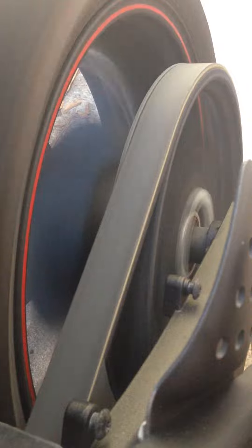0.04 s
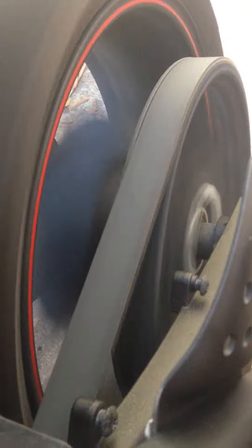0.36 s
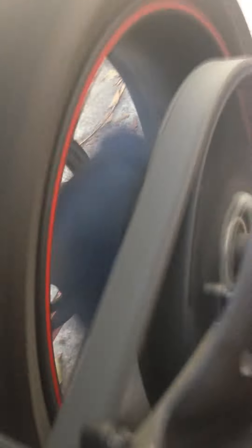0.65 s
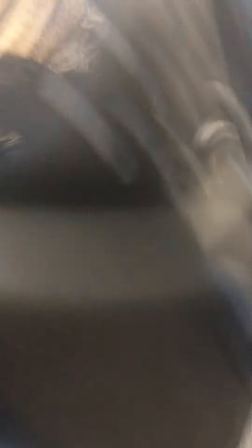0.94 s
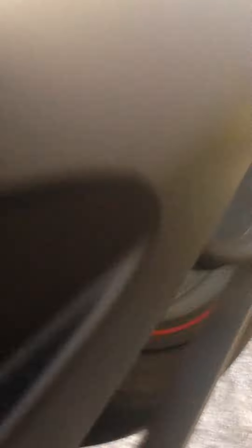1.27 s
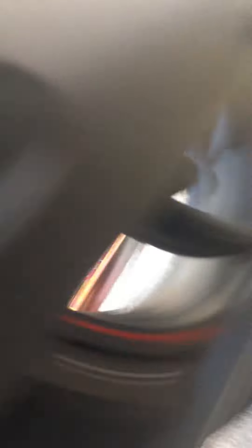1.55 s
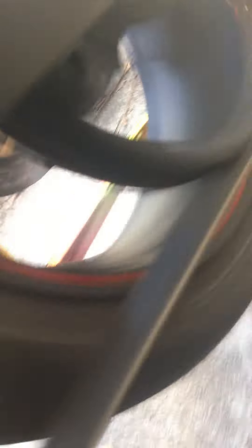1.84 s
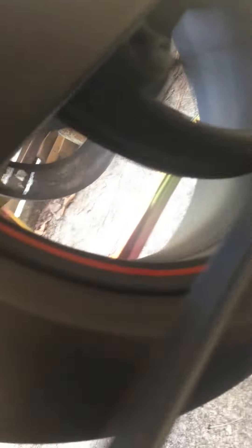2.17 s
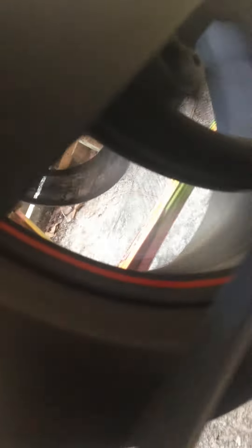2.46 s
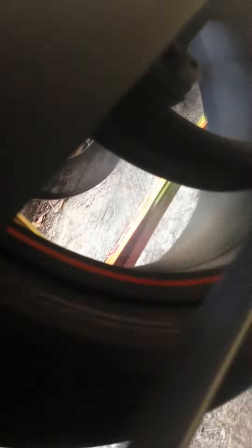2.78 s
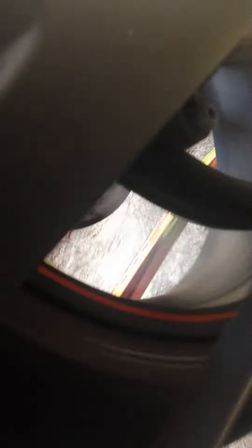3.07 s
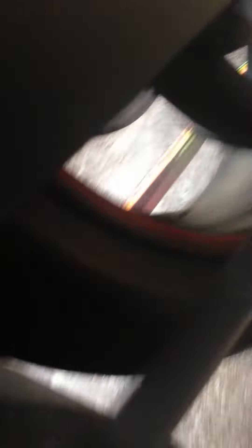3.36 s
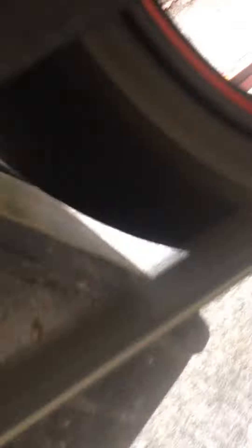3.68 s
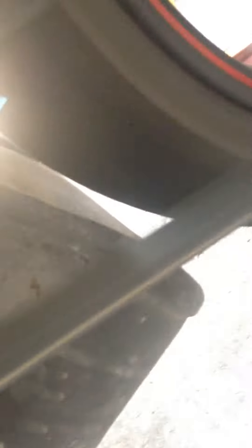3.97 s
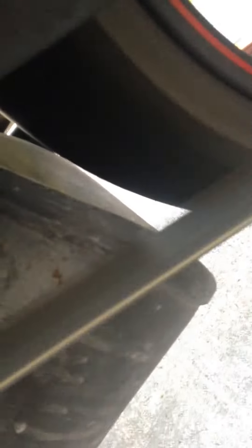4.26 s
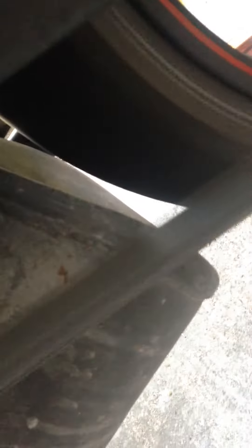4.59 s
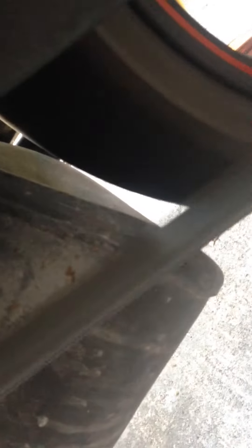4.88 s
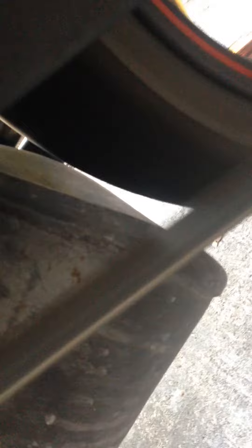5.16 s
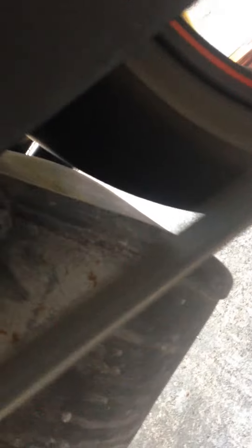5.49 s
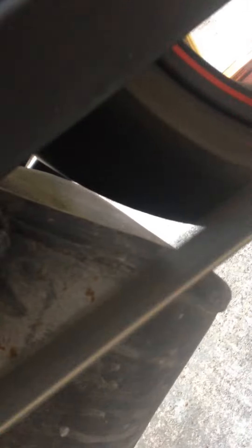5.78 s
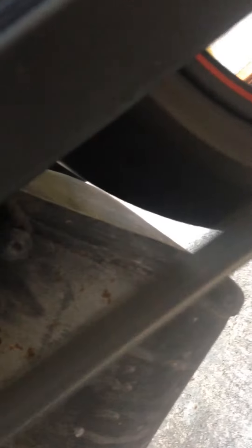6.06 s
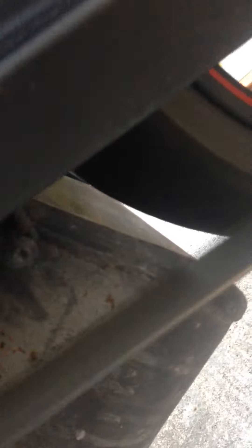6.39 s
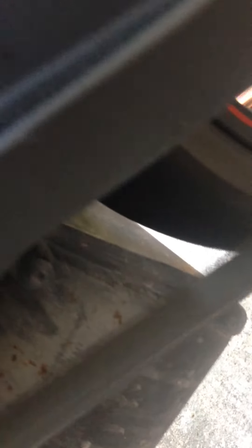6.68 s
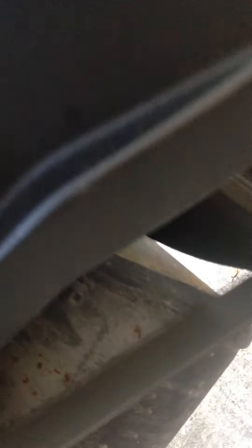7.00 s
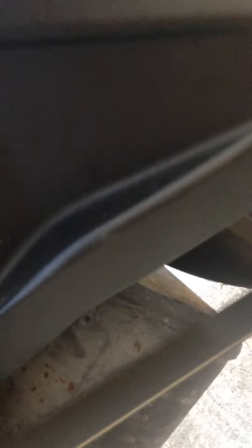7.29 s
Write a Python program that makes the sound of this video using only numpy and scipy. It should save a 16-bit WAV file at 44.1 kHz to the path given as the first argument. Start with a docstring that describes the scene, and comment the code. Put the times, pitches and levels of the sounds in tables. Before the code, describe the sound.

A V-twin motorcycle idles close by with uneven exhaust thumps, mechanical clatter and irregular sharp metal clunks from the drivetrain.

```python
"""Uneven exhaust thumps: a V-twin motorcycle idles in gear, its raised rear wheel turning, heard close
beside the belt drive. Each firing sends a gas pulse through the muffler, while valve gear and primary
drive clatter in the cases and the belt chirps on its pulley. Slack in the drivetrain takes up with
sharp metal clunks, and the hardest push a limiter down.
A faint high whine swells, sinks in pitch and fades near the end."""
import sys
import numpy as np
from scipy import signal
from scipy.fft import rfft, irfft, next_fast_len
from scipy.io import wavfile
from scipy.ndimage import uniform_filter1d, minimum_filter1d

SR = 44100
rng = np.random.default_rng(int(sys.argv[2]) if len(sys.argv) > 2 else 0)


def unload_audio(sound):
    """Save the sound as a 16-bit wav file, at the path given as the first command line argument."""
    columns = np.transpose(np.atleast_2d(sound))
    # keep every value between -1 and 1, then stretch to whole-number steps
    steps = np.round(np.clip(columns, -1, 1) * 32767)
    wavfile.write(sys.argv[1], SR, steps.astype(np.int16))


N = 328104
TIME_S = np.arange(N) / SR


def from_db(db):
    """Decibels to gain."""
    return 10 ** (np.asarray(db) / 20)


def unit_rms(x):
    """Scale to rms 1."""
    return x / np.sqrt(np.mean(x ** 2) + 1e-20)


def automation(rows):
    """One curve per value column, drawn through timed breakpoints."""
    times, *columns = np.transpose(rows)
    return [np.interp(TIME_S, times, column) for column in columns]


def add(out, start_s, sound):
    """Mix a sound in at a time, dropping what falls outside."""
    at = round(start_s * SR) + np.arange(len(sound))
    inside = (at >= 0) & (at < N)
    out[at[inside]] += sound[inside]


def coloured(x, spectrum, resonances=()):
    """A broad EQ curve with resonances standing out of it; the result has rms 1."""
    size = next_fast_len(len(x), real=True)
    hz = np.geomspace(1, SR / 2, 3000)
    points, db = np.transpose(spectrum)
    lift = 1 + sum(from_db(boost) ** 2 / (1 + (2 * (hz - centre) / width) ** 2)
                   for centre, width, boost in resonances)
    gain = from_db(np.interp(np.log(hz), np.log(points), db)) * np.sqrt(lift)
    gain *= np.minimum(hz / points[0], 1) ** 2 * np.minimum(points[-1] / hz, 1) ** 2   # ends roll off
    bin_gain = np.interp(np.arange(size // 2 + 1) * SR / size, hz, gain)
    return unit_rms(irfft(rfft(x, size) * bin_gain, size)[:len(x)])


def rattle(per_s, smooth):
    """Many small contacts of uneven size over smooth noise."""
    noise = rng.standard_normal(N)
    contacts = noise * (rng.random(N) < per_s / SR)
    return unit_rms(contacts) + smooth * noise


def whine(peak_s, half_width_s, pitch_hz, sag_hz_per_s, level_db, rough):
    """A faint, wavering high tone that swells and eases off as its pitch sinks."""
    t = TIME_S - peak_s
    wobble = rough * coloured(rng.standard_normal(N), [(10, -6), (80, 7), (300, -22)])
    turns = np.cumsum(pitch_hz - sag_hz_per_s * t) / SR
    return from_db(level_db) * np.exp(-(t / half_width_s) ** 2) * np.sin(2 * np.pi * turns + wobble)


# Standout chirps of the belt: peak_s, pitch_hz, level_db
BELT_CHIRPS = [(.638, 2890, -28.5), (.812, 2870, -31), (1.16, 2550, -26), (1.638, 2350, -22),
               (2.508, 2500, -23), (2.983, 2490, -23), (3.14, 2420, -21.5), (3.557, 2550, -24),
               (3.822, 2540, -25), (7.401, 2390, -25)]
# Automation for the faint random squeaks in between: time_s, pitch_hz, level_db
SQUEAK_CURVE = [(0, 2860, -38), (1.05, 2820, -34), (1.4, 2410, -30), (3.1, 2454, -25.5), (4.2, 2480, -34),
                (6.0, 2480, -37), (6.9, 2510, -29)]


def belt(gain_db, rough, half_width_s, squeaks_per_s, detune, spread_db):
    """Each brief slip of the belt's edge on the pulley flange sings one rough, thin note."""
    out, t = np.zeros(N), np.arange(-SR // 5, SR // 5) / SR
    waver = coloured(rng.standard_normal(N), [(10, -6), (80, 4), (300, -20)])
    pitch, level = automation(SQUEAK_CURVE)
    higher, louder = rng.standard_normal((2, N))
    squeaks = [(i / SR, pitch[i] * (1 + detune * higher[i]), level[i] + spread_db * louder[i])
               for i in np.flatnonzero(rng.random(N) < squeaks_per_s / SR)]
    envelope = np.exp(-(t / half_width_s) ** 2)
    for peak_s, hz, db in [*BELT_CHIRPS, *squeaks]:
        wobble = rough * np.roll(waver, -round(peak_s * SR))[:len(t)]
        add(out, peak_s + t[0], from_db(db + gain_db) * envelope * np.sin(2 * np.pi * hz * t + wobble))
    return out


# Valve and piston ticks after each thump: delay_cycles, half_width_cycles, strength
ENGINE_TICKS = [(.02, 0.12, 0.31), (.38, 0.11, 0.62), (.62, 0.066, 0.78), (.78, 0.12, 0.71)]


def crank_surge(beats, spread_db):
    """A modulation curve locked to the crank: one bump per tick, uneven from cycle to cycle."""
    phase = np.interp(TIME_S, beats[:, 0], np.arange(len(beats)))
    surge = np.zeros(N)
    for delay, width, strength in ENGINE_TICKS:
        cycle = np.round(phase - delay)
        uneven = from_db(spread_db * rng.uniform(-1.1, 1, len(beats) + 1))[cycle.astype(int) + 1]
        surge += strength * uneven * np.exp(-((phase - delay - cycle) / width) ** 2)
    return surge


# Bright hiss: freq_hz, gain_db
HISS_EQ = [(1800, -6), (2800, 2.5), (3600, 2), (4600, -6.5), (5300, -7), (6300, -13.5), (8000, -25),
           (10500, -26.5), (13000, -31), (15500, -43)]


def parts_hiss(surge):
    """Small moving parts blur into a pulsing hiss."""
    return coloured(rattle(per_s=2200, smooth=2.1) * (1 + 1.14 * surge), HISS_EQ)


# Low rush of gas: freq_hz, gain_db
RUSH_EQ = [(20, -4), (45, 4.5), (110, 7), (170, 12.5), (220, 5.5), (255, -5.5), (320, 1), (500, -0.5),
           (800, -22), (1500, -37)]
# Exhaust pipe resonances: centre_hz, width_hz, boost_db
PIPE_MODES = [(161.3, 13, 2.5), (286, 27, 5.5), (408, 67, 1)]


def gas_rush(surge):
    """Surging exhaust flow sets the pipe humming."""
    return coloured(rng.standard_normal(N) * (1 + 0.81 * surge), RUSH_EQ, PIPE_MODES)


# Tone of the primary cover: freq_hz, gain_db
COVER_EQ = [(1200, -30), (2000, 2), (2700, 5), (4000, -26)]
# Its resonances: centre_hz, width_hz, boost_db
COVER_MODES = [(2350, 100, 23.5), (2464, 120, 19)]


def cover_ring(surge):
    """The rattling drive rings the primary cover."""
    return coloured(rattle(per_s=1200, smooth=0.64) * (1 + 1.3 * surge), COVER_EQ, COVER_MODES)


# Clatter from beside the cases: freq_hz, gain_db
BESIDE_EQ = [(250, -9.5), (450, -6), (800, -5.5), (1150, -3), (1350, -5.5), (1600, -3.5), (2000, -3),
             (2500, -10), (3000, -15), (4000, -22), (6000, -59)]
# Case resonances: centre_hz, width_hz, boost_db
CASE_MODES = [(649, 45, 6.8), (838, 24, 10.1), (943, 66, 8.4), (1130, 28, 3.1), (1447, 33, 6.3),
              (1690, 60, 11.1), (1860, 50, 2.9)]
# The same clatter from above the belt: freq_hz, gain_db
ABOVE_EQ = [(150, -12), (235, 1.5), (330, -5), (480, -3.5), (700, -1), (950, -0.5), (1080, -2), (1240, 0.5),
            (1480, 0), (1750, 0.5), (2000, -1.5), (2850, -9.5), (3300, -15), (6000, -42)]


def case_clatter(surge, beside):
    """Gears, chain and valves rattle the cases, whose ring comes in as the mic moves beside them."""
    ringing = coloured(rattle(per_s=2200, smooth=1.0) * (1 + 0.7 * surge), BESIDE_EQ, CASE_MODES)
    above = coloured(rattle(per_s=2600, smooth=1.5) * (1 + 0.4 * surge), ABOVE_EQ)
    return np.sqrt(beside) * ringing + np.sqrt(1 - beside) * from_db(0.5) * above


# Fader ride for the whole engine bed at the moving mic: time_s, level_db
BED_FADER = [(0, -23.5), (.45, -26.5), (.9, -23.5), (2.15, -24), (2.6, -22.5), (3.2, -22), (3.75, -24),
             (4.3, -22.5), (5.55, -24), (6.05, -26.5), (6.8, -23), (7.44, -24)]
# Cover ring against the clatter, strongest when the mic faces it: time_s, level_db
COVER_FADER = [(0, -11), (1.1, -8), (1.9, -5.5), (3.2, -7.5), (4.0, -12), (6.2, -12), (7.44, -6.5)]


def engine_bed(beats, mic_move_s, rush_above_db, rush_beside_db, hiss_db):
    """Clatter, cover, rush and hiss surge together; their levels are set against the clatter."""
    (bed_db,), (cover_db,) = automation(BED_FADER), automation(COVER_FADER)
    surge = crank_surge(beats, spread_db=4.4)
    beside = np.interp(TIME_S, mic_move_s, [0, 1])   # 0 above the belt, 1 down beside the cases
    clatter = case_clatter(surge, beside)
    cover = from_db(cover_db) * cover_ring(surge)
    rush = from_db(rush_above_db + (rush_beside_db - rush_above_db) * beside) * gas_rush(surge)
    hiss = from_db(hiss_db) * parts_hiss(surge)
    return from_db(bed_db) * (clatter + cover + rush + hiss)


def slack_taps(count, from_s, to_s, force_db, spread_db, sharpness_db, ring_db):
    """Cues for light knocks of the slack at random moments, in rows like the clunks."""
    return [(from_s + (to_s - from_s) * when, force_db + spread_db * (2 * size - 1), sharpness_db, ring_db)
            for when, size in rng.random((count, 2))]


# Drivetrain clunks: start_s, force_db, sharpness_db, ring_db
CLUNK_CUES = [(.242, -24.5, -3.5, 4), (.556, -15.5, -15, 3), (.708, -27, -4, -7), (.970, -26.5, -1, -2),
              (1.17, -21, -4, 0.5), (1.254, -17, -5, 4), (1.717, -15, -7, -14), (1.810, -15.5, -8, -4.5),
              (1.956, -22, -8, -3), (2.012, -12.5, -4.5, -0.5), (2.468, -20.5, -13, -1),
              (2.526, -18.5, -6, -5), (3.072, -21, -1, -4), (3.168, -23.5, -4, 1.5),
              (3.244, -18.5, -1.5, -8), (3.458, -20, 1, -1.5), (3.628, -16, -7, -2.5), (3.974, -22, -4, -7),
              (4.192, -21.5, -1, -3), (4.362, -18.5, -8, -6), (4.602, -18, -12, -9), (4.657, -16, -5, -1.5),
              (4.910, -18.5, -1.5, -4), (5.015, -23, -10, -8), (5.033, -22.5, -10, -10),
              (5.077, -9, 2, 1.5), (5.126, -11.5, -2, 0), (5.229, -24.5, -2, -2), (5.304, -18.5, 1.5, -4),
              (5.431, -15, 3.5, -5.5), (5.642, -15.5, -1, 0), (5.690, -18, 6, 4), (5.862, -15.5, 3, 4)]
# Steel ring of a clunk: pitch_hz, level_db, t60_s
STEEL_MODES = [(663, -7, 0.091), (1097, -6, 0.031), (1285, -8.5, 0.031), (2118, 4, 0.065),
               (2249, -0.5, 0.046), (2826, -12, .03), (3474, -13.5, 0.058), (4020, -13, .025),
               (5475, -17, .024), (6280, -20, .026), (7360, -27, 0.028), (9150, -41, 0.026)]
# Dense modes of swingarm and pulley, as low body, mid body and top crack: freq_hz, gain_db
LOW_EQ = [(120, -12), (220, -10), (300, -6.5), (420, 0.5), (530, -2.5), (680, 3), (900, -10), (1500, -27)]
MID_EQ = [(500, -40), (850, 1.5), (1200, 4), (1450, 2), (1700, 3.5), (2400, -5), (3000, -3), (5000, -27)]
CRACK_EQ = [(1500, -12), (2800, -6), (3700, 4.5), (4600, -4.5), (5400, 0), (6600, -6), (8000, -18.5),
            (11000, -23.5), (15500, -64)]


def clunks(taps, seat_s, body_t60_s, crack_t60_s, low_db, mid_db, steel_db, crack_db):
    """Slack closes metal on metal: a short crack, a steel ring and a body that outlasts the crack."""
    out, t = np.zeros(N), np.arange(SR // 10) / SR
    blows = [*CLUNK_CUES, *taps]
    # close modes ring as bands of noise, fresh for every blow
    lows, mids, cracks = (coloured(rng.standard_normal(len(blows) * len(t)), eq).reshape(len(blows), -1)
                          for eq in (LOW_EQ, MID_EQ, CRACK_EQ))

    def swell(rise_s, t60_s):
        """Builds while the parts seat, then decays."""
        return np.minimum(t / rise_s, 1) * np.exp(-np.log(1000) * np.maximum(t - rise_s, 0) / t60_s)

    for k, (start_s, force, sharpness, ring) in enumerate(blows):
        attack_s = seat_s * np.exp(-0.08 * force)   # light knocks close more slowly
        steel = np.zeros(len(t))
        for hz, db, t60_s in STEEL_MODES:
            envelope = from_db(db + 1.5 * rng.normal()) * swell(attack_s, t60_s)
            detuned_hz = hz * (1 + 0.012 * rng.normal())
            steel += envelope * np.sin(2 * np.pi * (detuned_hz * t + rng.random()))
        thinning_db = 0.42 * sharpness   # sharper blows carry less low end
        low = from_db(low_db - thinning_db) * lows[k] * swell(1.35 * attack_s, body_t60_s)
        mid = from_db(mid_db) * mids[k] * swell(attack_s, body_t60_s)
        crack = from_db(crack_db + sharpness) * cracks[k] * swell(0.58 * attack_s, crack_t60_s)
        add(out, start_s, from_db(force) * (low + mid + crack + from_db(steel_db + ring) * steel))
    return out


# The gently hunting idle: time_s, crank_rpm
IDLE_SPEED = [(0.0, 1417.9), (0.6, 1401.1), (0.8, 1454.5), (1.4, 1397.5), (1.8, 1470.6), (2.0, 1394.2),
              (2.6, 1443.5), (2.8, 1391.0), (3.4, 1415.9), (3.6, 1389.8), (4.4, 1410.4), (5.4, 1381.1),
              (6.6, 1447.9), (7.44, 1415.4)]
# Weight of an ordinary firing: time_s, level_db
FIRING_LEVEL = [(0, -8), (.55, -10.5), (.7, -4.5), (1.05, -6), (1.35, -10.5), (1.66, -7), (2.12, -10.5),
                (2.45, -8), (3.2, -6.5), (3.85, -13), (4.05, -8.5), (4.76, -6.5), (5.0, -10.5), (5.4, -8),
                (6.05, -16), (6.4, -7.5), (6.68, -10), (7.05, -5.5)]
# Accents, where a cycle burns weakly and the next thumps hard on the unburnt charge: near_s
ACCENTS = [.16, .42, 1.09, 1.6, 1.93, 2.27, 2.78, 2.95, 3.29, 3.63, 3.98, 4.32, 4.49, 4.66, 5.26, 6.37,
           6.87]


def firings(first_s, spread_db, hard_db, weak_loss_db):
    """The main firing comes once every two crank turns; returns rows of time_s, level_db."""
    rpm, = automation(IDLE_SPEED)
    cycles = np.cumsum(rpm) / (2 * 60 * SR)
    cycles -= np.interp(first_s, TIME_S, cycles)
    times = np.interp(np.arange(int(cycles[-1]) + 1), cycles, TIME_S)
    times = np.r_[2 * times[0] - times[1], times, 2 * times[-1] - times[-2]]   # runs on past both ends
    db = np.interp(times, *np.transpose(FIRING_LEVEL)) + spread_db * rng.standard_normal(len(times))
    hard = np.abs(times[:, None] - ACCENTS).argmin(axis=0)
    db[hard - 1] -= weak_loss_db
    db[hard] = hard_db
    return np.column_stack([times, db])


def puff(t, pipe_hz, half_width_s, overtone_hz, overtone):
    """One gas pulse, rounded by the muffler into a short swing of pressure with a weaker overtone."""
    swing = np.sin(2 * np.pi * pipe_hz * t) + overtone * np.sin(2 * np.pi * overtone_hz * t)
    return np.exp(-(t / half_width_s) ** 2) * swing


# Airy spit of escaping gas: freq_hz, gain_db
JET_EQ = [(4000, -20), (6500, 4.5), (8000, -5), (11000, 1), (13000, -9), (15500, -11)]


def exhaust(beats, main_db, lead_db, lead_s, echo_s, echo_gain, jet_db, jet_half_width_s):
    """One cylinder fires softly just ahead of the other; each pulse spits and echoes once in the pipe."""
    thumps, flow = np.zeros(N), np.zeros(N)
    t = np.arange(-SR // 20, SR // 20) / SR
    spit = np.exp(-(t / jet_half_width_s) ** 2)
    for (time_s, db), (size, late, tone, gas) in zip(beats, rng.standard_normal((len(beats), 4))):
        main = puff(t, pipe_hz=87 + 1.9 * tone, half_width_s=0.0097, overtone_hz=127, overtone=0.15)
        lead = puff(t, pipe_hz=87 - 4 * tone, half_width_s=0.0099, overtone_hz=145, overtone=0.16)
        main *= from_db(db + main_db)
        lead *= from_db(lead_db + 2.6 * np.tanh(size))
        main_start_s = time_s + t[0]
        lead_start_s = main_start_s - lead_s + .0012 * late
        for start_s, pulse, jet_gain in (main_start_s, main, .75), (lead_start_s, lead, 1):
            add(thumps, start_s, pulse)
            add(thumps, start_s + echo_s, echo_gain * pulse)
            add(flow, start_s, jet_gain * from_db(2.3 * gas) * spit)
    return thumps + from_db(jet_db) * flow * coloured(rng.standard_normal(N), JET_EQ)


def scene():
    """Exhaust, clunks, engine bed, belt and whine at one close mic."""
    beats = firings(first_s=.078, spread_db=1.5, hard_db=-5, weak_loss_db=3.5)
    thumps = exhaust(beats, main_db=.5, lead_db=-13.0, lead_s=0.03294, echo_s=0.02085, echo_gain=0.23,
                     jet_db=-50.0, jet_half_width_s=0.0056)
    taps = slack_taps(count=8, from_s=1.0, to_s=5.0, force_db=-28, spread_db=4,
                      sharpness_db=-7.5, ring_db=-5)
    knocks = clunks(taps, seat_s=0.002, body_t60_s=0.088, crack_t60_s=0.052,
                    low_db=-3.6, mid_db=2.5, steel_db=0.6, crack_db=-1.64)
    bed = engine_bed(beats, mic_move_s=(.95, 1.45), rush_above_db=-3.5, rush_beside_db=-8, hiss_db=-11)
    chirps = belt(gain_db=5.0, rough=0.6, half_width_s=.0095, squeaks_per_s=12, detune=.045, spread_db=2.5)
    tone = whine(peak_s=7.3, half_width_s=.15, pitch_hz=5100, sag_hz_per_s=1100, level_db=-45, rough=.9)
    return (tone + chirps + bed + knocks + thumps)[None]


def limiter(x, ceiling_db, release_db_per_s):
    """Peaks above the ceiling pull the gain down at once; it creeps back up."""
    release = release_db_per_s * np.arange(N) / SR
    over_db = np.maximum(20 * np.log10(np.abs(x) + 1e-9) - ceiling_db, 0)
    held_db = np.maximum.accumulate(over_db + release, axis=-1) - release
    gain_db = uniform_filter1d(minimum_filter1d(-held_db, size=177), size=177)   # smoothed over 4 ms
    return x * from_db(gain_db)


def record(dry):
    """The limiter ducks the mix after hard peaks; a steep low-pass cuts the top."""
    limited = limiter(dry, ceiling_db=-3.0, release_db_per_s=21.5)
    return signal.sosfilt(signal.ellip(10, .1, 80, 15500, fs=SR, output="sos"), limited)


dry = scene()
out = record(dry)
unload_audio(out)
```